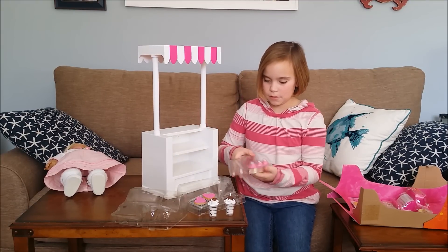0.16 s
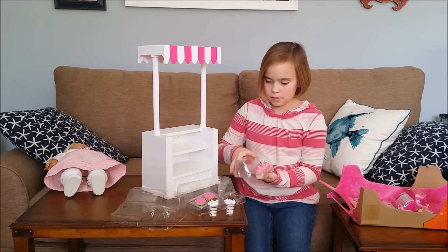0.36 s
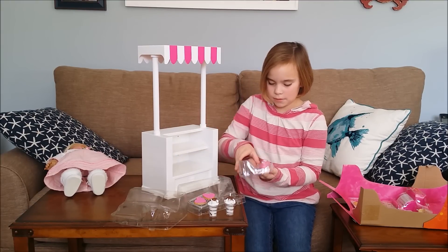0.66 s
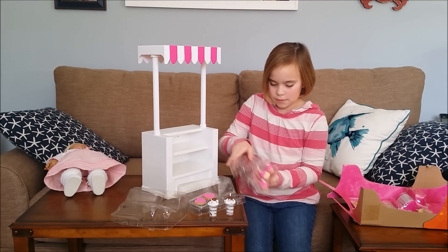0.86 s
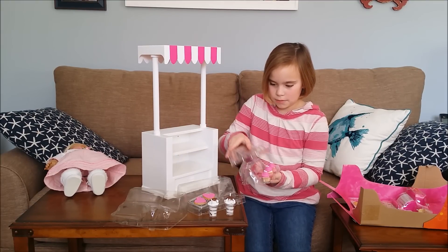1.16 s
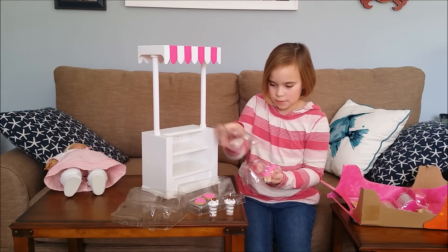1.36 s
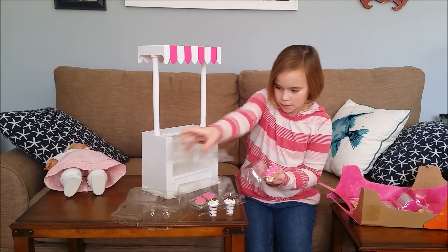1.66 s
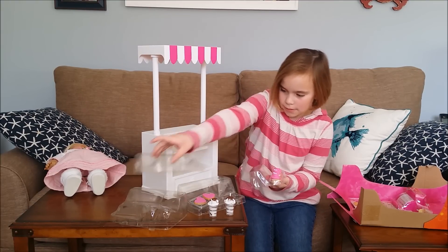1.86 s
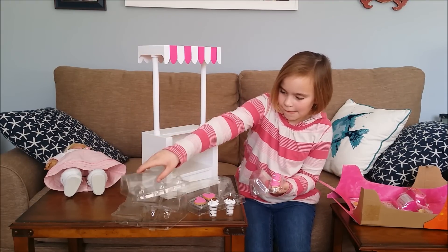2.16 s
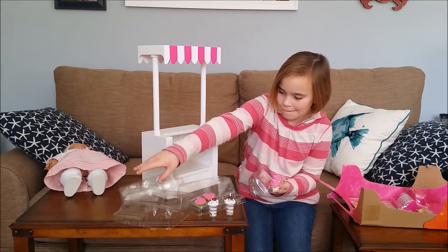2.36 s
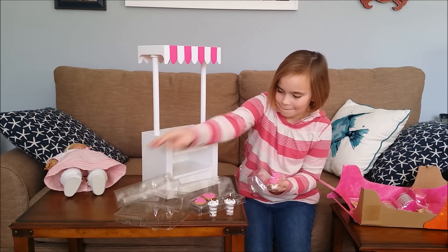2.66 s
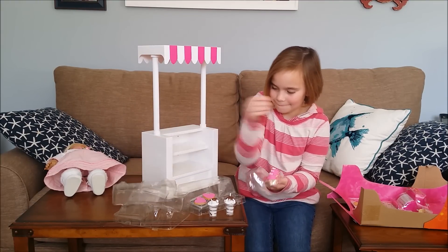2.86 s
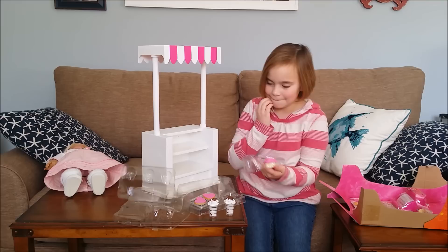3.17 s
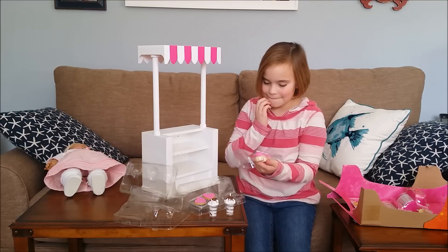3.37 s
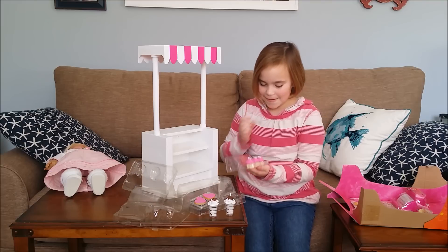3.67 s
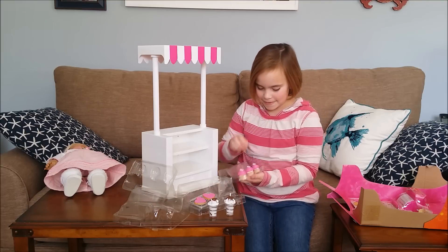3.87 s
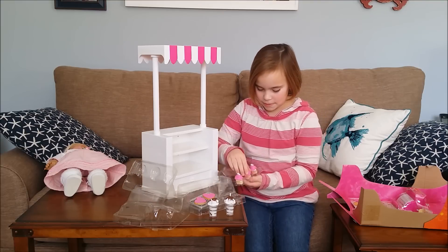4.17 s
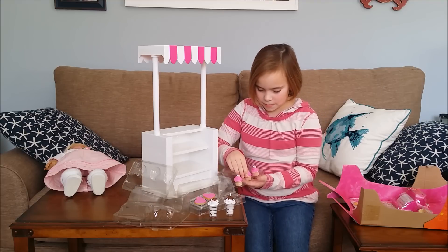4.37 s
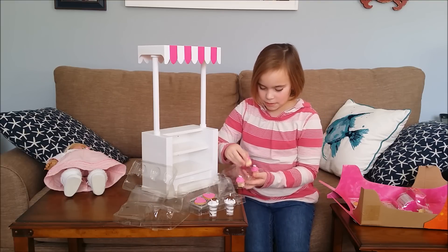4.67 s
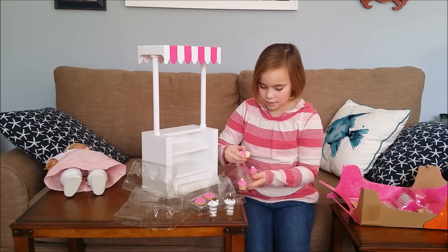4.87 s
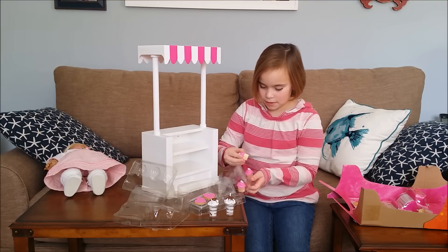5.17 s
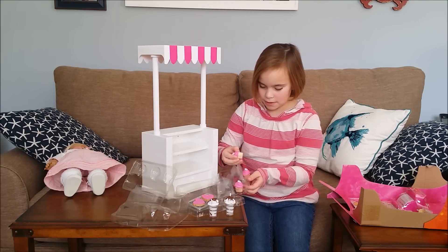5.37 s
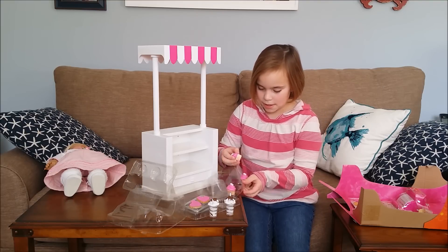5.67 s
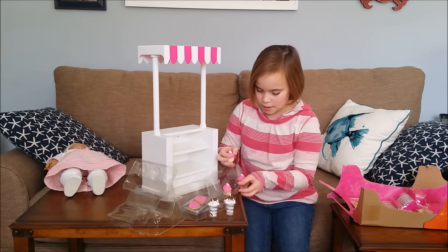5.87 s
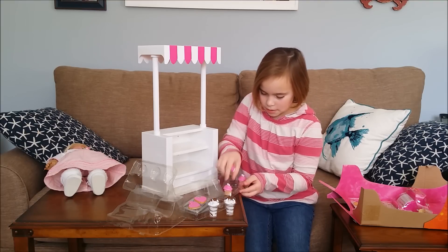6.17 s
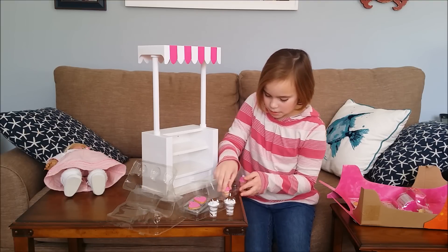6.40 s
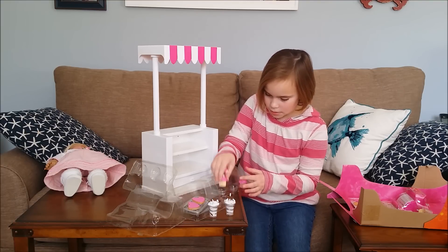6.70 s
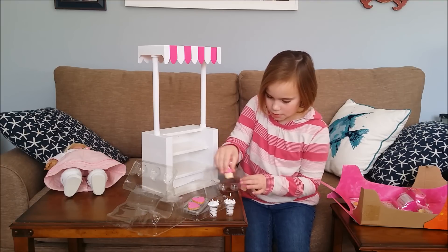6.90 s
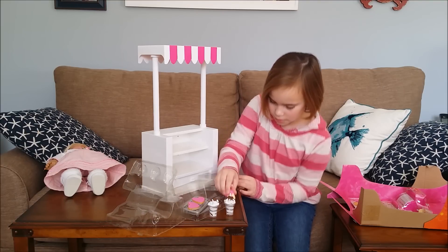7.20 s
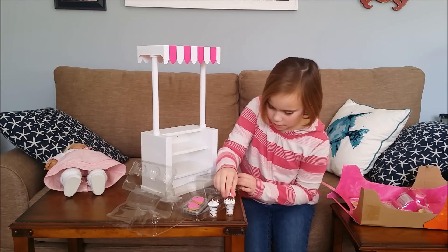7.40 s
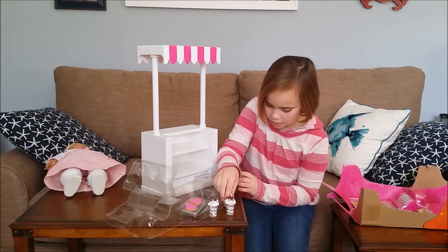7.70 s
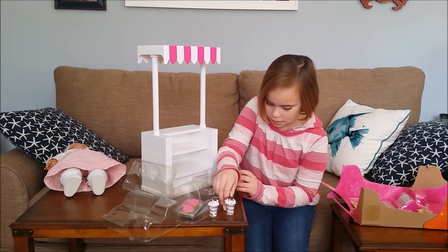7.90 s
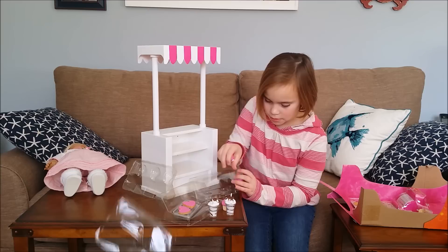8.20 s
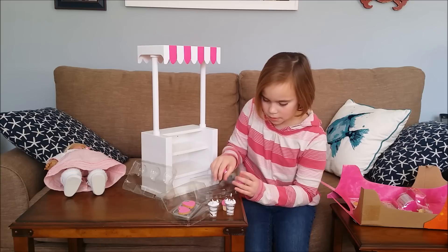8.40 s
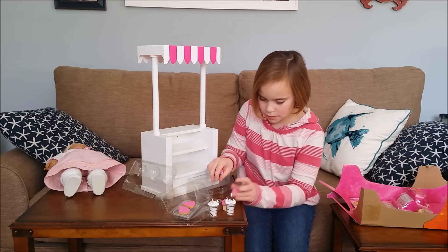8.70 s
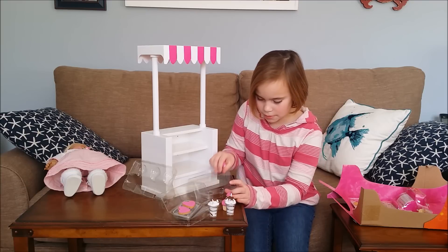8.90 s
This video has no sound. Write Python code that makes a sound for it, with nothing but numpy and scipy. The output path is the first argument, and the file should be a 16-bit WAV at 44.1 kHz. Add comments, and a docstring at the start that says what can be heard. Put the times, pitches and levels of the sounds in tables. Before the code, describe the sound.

A stiff clear plastic tray is handled close to the microphone in a furnished room. It starts with light rustling and small crackles, then sharper snaps and dull pops around 1 second as it is pried open. From about 2.2 to 3.6 seconds the plastic drops and shifts on a wooden table with hollow taps, soft thuds and crinkles. Sparse, quieter clicks follow, with brief scraping near 5.5 to 6 seconds and a light knock at 6.5. Between 7.1 and 7.5 seconds comes the brightest cluster of loud snaps, with a rubbing scrape. Small knocks continue around 8 seconds. At 8.7 a hollow plastic toy topples onto the wood with a short clatter and crackle, the loudest knock, followed by a last small tap near 9. A faint mains hum, low house rumble and hiss run throughout.

```python
"""Film rustles and creases snap as a stiff clear plastic tray is pried open on a wooden table.
Its walls buckle with dull pops; it is dropped and pushed about, toys knock, and one topples near the end.
Creases release elastic energy in bright bursts, impacts excite the modes of tray, toy and table top,
and sliding friction scrapes. Two close microphone ports hear this directly and through a furnished room,
over mains hum, a low house rumble and hiss."""
import sys
import numpy as np
from scipy import signal
from scipy.fft import rfft, irfft, next_fast_len
from scipy.io import wavfile
from scipy.ndimage import uniform_filter1d

SR = 44100
rng = np.random.default_rng(int(sys.argv[2]) if len(sys.argv) > 2 else 0)


def wav_out(sig):
    """Save sig, one row per channel (or a flat mono array), as 16-bit PCM at SR to the path in sys.argv[1]."""
    wavfile.write(sys.argv[1], SR, np.round(np.clip(np.atleast_2d(sig).T, -1, 1) * 32767).astype(np.int16))


N = 399100

# spectra of the film and of its finest creases: f/Hz, relative level/dB
FILM_SPECTRUM = [(1290, -10.5), (2200, -6), (2790, -7), (3040, -6.5), (3910, -5), (5090, -3), (6660, -1.5),
                 (7570, -7), (9500, -9.5), (12400, -31), (20900, -120)]
FINE_CREASE_SPECTRUM = [(7000, -19.5), (9000, 10), (10000, -6.5), (14000, -8)]
# modes of the table top: f/Hz, bandwidth/Hz, gain/dB
TABLE_MODES = [(117.1, 37, -15.5), (183.1, 37, -3), (213.5, 42, -1), (253, 36, -3), (321, 43, -5.5)]
# handling of the tray: t/s, rustle level/dB, scraping re rustle/dB
HANDLING = [(0.0, -47, 0), (0.2, -58, 3), (0.58, -63, -0.5), (0.9, -66.5, 4.5), (1.06, -56.5, -2),
            (1.39, -67.5, -4), (2.24, -70.5, -5), (2.42, -57, 3), (4.06, -72.5, -4), (5.22, -68, 1),
            (5.46, -57, 6.5), (5.53, -54.5, 6.5), (5.61, -55, 6.5), (5.72, -51, 4), (5.86, -58, 5.5),
            (5.95, -54.5, 4.5), (6.3, -67.5, -1), (6.7, -56, 4.5), (6.86, -67, 5.5), (7.16, -71, 5),
            (7.31, -48.5, 5.5), (7.71, -62.5, 9), (8.22, -52, 1.5), (8.34, -68.5, 4), (8.62, -64.5, 1),
            (8.75, -51.5, 16), (9.05, -63, -3.5)]


def amp(db):
    """Amplitude ratio of a level in dB."""
    return 10 ** (np.asarray(db) / 20)


def unit(x):
    """Normalisation to rms 1."""
    return x / np.sqrt(np.mean(x ** 2) + 1e-20)


def along(points, hz):
    """Interpolation of (f/Hz, value) points on a logarithmic frequency axis."""
    f, values = np.transpose(points)
    return np.interp(np.log(hz + 1), np.log(f + 1), values)


def curves(rows):
    """Linear interpolation in time: one value per sample for each column after t/s."""
    times, *columns = np.transpose(rows)
    return [np.interp(np.arange(N) / SR, times, column) for column in columns]


def filtered(x, response):
    """Linear filtering: the spectrum of x times a complex frequency response."""
    n = x.shape[-1]
    size = next_fast_len(n + SR // 4)
    return irfft(rfft(x, size) * response(np.fft.rfftfreq(size, 1 / SR)), size)[..., :n]


def coloured(x, spectrum):
    """Spectral shaping by a filter whose impulse response has energy 1."""
    def response(hz):
        gain = amp(along(spectrum, hz))
        return gain / np.sqrt(np.mean(gain ** 2))
    return filtered(x, response)


def resonances(modes):
    """Modal superposition: damped resonators (f/Hz, bandwidth/Hz, gain/dB) of alternating sign."""
    return lambda f: sum((-1) ** k * amp(db) * 1j * f * width / (f0 * f0 - f * f + 1j * f * width)
                         for k, (f0, width, db) in enumerate(modes))


def add(track, start_s, sound):
    """Superposition of a sound on a track."""
    part = track[..., round(start_s * SR):][..., :sound.shape[-1]]
    part += sound[..., :part.shape[-1]]


def grains(per_s, spread_db, life_s, bed):
    """Shot noise: random decaying pulses over a steady bed modulate white noise, rms 1."""
    hits = (rng.random(N) < per_s / SR) * amp(spread_db * rng.standard_normal(N))
    pulses = signal.lfilter([1], [1, -np.exp(-1 / (SR * life_s))], hits)
    return unit(rng.standard_normal(N) * (unit(pulses) + bed))


def contact_bursts(envelope, count):
    """Many small contacts sum to noise: bursts under an envelope, their spectra partly whitened."""
    spectra = rfft(envelope * rng.standard_normal((count, len(envelope))))
    bursts = irfft(spectra / np.abs(spectra) ** 0.14, len(envelope))
    return bursts * np.linalg.norm(envelope) / np.linalg.norm(bursts, axis=1, keepdims=True)


def noise_floor():
    """Partial coherence: the two ports share part of a steady rumble and hiss."""
    # rumble and hiss: f/Hz, relative level/dB
    spectrum = [(18, -40), (30, -42), (45, -4), (91, -12), (123, 3.5), (152, -24), (191, -0.5), (320, -16),
                (393, -6), (470, -20), (728, -17.5), (1040, -21.5), (14500, -30.5), (14800, -66)]
    # likeness of the ports: f/Hz, correlation
    coherence = [(60, 0.72), (180, 0.95), (550, 0.072), (1650, -0.5), (4970, -0.07), (15000, 0.15)]

    def mid_and_side(hz):
        angle = np.arccos(np.clip(along(coherence, hz), -1, 1)) / 2
        return amp(along(spectrum, hz)) * [np.cos(angle), np.sin(angle)]
    mid, side = filtered(rng.standard_normal((2, N)), mid_and_side)
    return amp(-55) * unit(np.array([mid + side, mid - side]))


def mains_hum():
    """Phase modulation: a common random walk makes the hum's spectral lines unsteady."""
    # hum lines: f/Hz, rms level/dB
    lines = [(59.2, -64.5), (118.4, -69.5), (183.0, -77)]
    t = np.arange(N) / SR
    drift = np.cumsum(rng.standard_normal(N)) * 0.016  # radians at 60 Hz
    return sum(np.sqrt(2) * amp(db)
               * np.sin(2 * np.pi * hz * t + drift * hz / 60 + rng.uniform(0, 2 * np.pi))
               for hz, db in lines)


def house_rumble():
    """Narrow-band noise: two low resonances give a deep rumble that comes and goes."""
    # course of the rumble: t/s, level/dB
    levels = [(0, -49), (.3, -53.5), (1.76, -66), (3.48, -53), (3.73, -64), (5, -65), (5.9, -53.5),
              (6.32, -68), (7.6, -54.5), (9.05, -65)]
    deep = resonances([(66.4, 13.0, -0.43), (127.5, 22.0, -1.6)])
    rumble = filtered(rng.standard_normal(N), lambda hz: deep(hz) ** 2)
    return amp(curves(levels)[0]) * unit(rumble)


def reverberation(source):
    """A diffuse field decays exponentially; the source moves, so each 0.2 s gets a new tail."""
    # room decay: f/Hz, reverberation time/s, level/dB
    bands = [(150, 0.37, 2), (495, 0.62, 1.5), (1400, 0.27, -0.5), (3870, 0.35, 2), (8700, 0.32, -5),
             (14000, 0.13, 13.5)]
    # long waves reach both ports alike: f/Hz, correlation
    coherence = [(300, 0.96), (1000, 0.1), (3000, 0.072)]
    out, step = np.zeros((2, N)), SR // 5
    starts = range(0, N, step)
    hz, t, noise = signal.stft(rng.standard_normal((2, len(starts), SR * 2 // 5)), SR, nperseg=256)
    alike = np.clip(along(coherence, hz), 0, 1)[:, None]
    noise[1] = alike * noise[0] + np.sqrt(1 - alike ** 2) * noise[1]
    band_hz, t60, level_db = np.transpose(bands)
    decay = amp(-60 * t / along(np.transpose([band_hz, t60]), hz)[:, None])
    band_gain = amp(along(np.transpose([band_hz, level_db]), hz))[:, None]
    decay *= band_gain / np.linalg.norm(decay, axis=1, keepdims=True)
    tails = signal.istft(noise * decay, SR, nperseg=256)[1] / np.sqrt(128)
    for k, start in enumerate(starts):
        wet = signal.fftconvolve(source[None, start:start + step], tails[:, k], axes=1)
        add(out, start / SR + .006, wet)
    return out


def with_wall_echoes(pair):
    """Early reflections follow the direct sound, with slightly different delays at each port."""
    # echoes: delay/s, level/dB
    echoes = [(.0025, -9.5), (.0078, -8.5), (0.013, -14), (.018, -14), (0.037, -12.5)]
    response = np.zeros((2, SR // 20))
    response[:, 0] = 1
    for delay_s, db in echoes:
        taps = np.round((delay_s + rng.normal(0, .0001, 2)) * SR).astype(int)
        response[[0, 1], taps] += amp(db)
    return signal.fftconvolve(pair, response, axes=1)[:, :N]


def at_ports(source):
    """Directivity: sound from the table's direction differs in level and phase between the ports."""
    # left over right: f/Hz, level difference/dB
    level_difference = [(60, -14), (130, 6.5), (290, 0), (640, 3), (1410, 2.5), (3100, 3), (6820, 13),
                        (15000, -31)]
    # left ahead of right: f/Hz, phase/rad
    phase_lead = [(0, 0.5), (6030, 1.55), (7060, -2.5), (9650, 5), (11500, 8), (12400, 7), (14300, -3)]
    pan_db = -2.5  # the hands work a little to the right
    half = np.array([[.5], [-.5]])

    def response(hz):
        phase = half * np.interp(hz, *np.transpose(phase_lead))
        return amp(half * along(level_difference, hz)) * np.exp(1j * phase)
    return filtered(with_wall_echoes(source * amp(half * pan_db)), response)


def film_rustle():
    """Crackling noise: the handled film emits dense tiny pulses in random swells."""
    rustle_db, _ = curves(HANDLING)
    swells = unit(uniform_filter1d(uniform_filter1d(rng.standard_normal(N), SR // 40), SR // 40))
    crackle = grains(per_s=500, spread_db=4, life_s=.0012, bed=.5) * amp(2.5 * swells)
    fine = amp(-10.5) * coloured(crackle, FINE_CREASE_SPECTRUM)
    return amp(rustle_db) * (coloured(crackle, FILM_SPECTRUM) + fine)


def scraping():
    """Sliding friction radiates noise, excites a hollow of the tray and shakes the table."""
    # tray sliding on wood: f/Hz, relative level/dB
    spectrum = [(240, -53), (400, -10), (454, -9.5), (589, -10.5), (847, -0.5), (1200, -3), (1520, -2),
                (1650, -5), (3000, -12.5), (3900, -17), (6600, -120)]
    # the rubbed hollow sings out: t/s, duration/s, level/dB
    rubs = [(0.12, 0.079, -56), (0.249, 0.024, -43), (5.698, 0.03, -44), (5.862, 0.035, -47),
            (7.196, 0.03, -30.5), (7.31, 0.061, -37.5), (8.564, 0.062, -40), (8.936, 0.03, -38.5)]
    hollow_db, ramp_s = -15, 0.019
    t = np.arange(N) / SR
    rustle_db, excess_db = curves(HANDLING)
    scrape_db = rustle_db + excess_db
    rumble_db = -62.5 + 0.43 * (scrape_db + 66)  # grows more slowly than the scraping
    rub_gain = sum(amp(db) * np.clip(np.minimum(t - start, start + length - t) / ramp_s, 0, 1)
                   for start, length, db in rubs)
    friction = grains(per_s=70, spread_db=2, life_s=0.004, bed=1.7)
    shaking = grains(per_s=30, spread_db=2, life_s=0.01, bed=2.0)
    scrape = unit(coloured(friction, spectrum))
    hollow = unit(filtered(friction, resonances([(850, 60, 0)])))
    rumble = unit(filtered(shaking, resonances([(189, 87, 2.5), (433, 265, -4)])))
    return (amp(scrape_db) * scrape + (amp(scrape_db + hollow_db) + rub_gain) * hollow
            + amp(rumble_db) * rumble)


def table_thuds():
    """Impact excitation: a half-sine force pulse rings the modes of the table top."""
    # something lands: t/s, peak level/dB
    landings = [(2.424, -38), (2.545, -34), (3.24, -32), (3.302, -33), (6.485, -29.5), (6.512, -37),
                (7.312, -35.5), (8.002, -42.5), (8.671, -20), (8.7, -24.5), (8.96, -33)]
    contact_s = 0.0018
    out, t = np.zeros(N), np.arange(SR // 5) / SR
    force = np.sin(np.pi * np.minimum(t / contact_s, 1))
    ring = filtered(force, resonances(TABLE_MODES))
    for start, db in landings:
        add(out, start, amp(db) * ring / np.abs(ring).max())
    return out


def toy_clatter():
    """Modal ringing: a hollow toy topples, and its brief rattle drives its own resonances."""
    # modes of the toy: f/Hz, bandwidth/Hz, gain/dB
    toy_modes = [(664, 48, -3.5), (843, 40, -6), (1060, 30, 1), (1506, 36, -3.5), (1702, 89, 0.5),
                 (1927, 51, 4), (2030, 44, 2.5), (2600, 880, -12)]
    start_s, drive_db, rise_s, decay_s = 8.669, 4.1, 0.0035, 0.026
    force, t = np.zeros(N), np.arange(SR // 6) / SR
    envelope = np.exp(-t / decay_s) * (1 - np.exp(-t / rise_s))
    add(force, start_s, amp(drive_db) * contact_bursts(envelope, count=1)[0])
    return filtered(force, resonances(toy_modes))


def pops_and_knocks():
    """Buckling and impact: each burst rings its own pitch, the tray and the table; the film swishes."""
    # walls buckle, toys knock: t/s, level/dB, f/Hz, gain of that pitch/dB, swish gain/dB, decay time/s
    events = [(0.968, -27.5, 1540, 9, -12.5, 0.022), (1.064, -31, 340, 14, -8, 0.0081),
              (1.165, -37, 1800, 15, -3, 0.021), (1.194, -26.5, 960, -5, -11.5, 0.01),
              (1.2, -28, 331, 18.5, -23, 0.006), (2.211, -35.5, 1006, 2, -19, 0.022),
              (2.255, -28.5, 880, -7, -16.5, 0.04), (2.417, -27.5, 760, 9.5, -23, 0.062),
              (2.435, -33, 510, 21, -28, 0.028), (2.544, -24.5, 706, 10.5, -29, 0.012),
              (2.633, -23, 702, 11.5, -26, 0.016), (2.818, -35.5, 675, 12, -32, 0.037),
              (3.112, -31, 751, 3, -11, 0.09), (3.24, -20, 1130, 7, -21.5, 0.012),
              (3.29, -29, 400, 6.5, -21, 0.082), (3.537, -29, 1240, 8.5, -20, 0.022),
              (3.545, -38, 2860, 17, -17, 0.02), (3.625, -35.5, 2780, 7.5, -15, 0.027),
              (4.025, -45.5, 1500, 16, -9, 0.016), (4.043, -39.5, 1580, 13.5, -8, 0.014),
              (4.088, -42, 2500, 16.5, 9.5, 0.019), (4.38, -42, 1033, -3, -7, 0.07),
              (4.391, -28, 915, 2, -28, 0.0077), (4.869, -45.5, 1370, 11.5, -5.5, 0.017),
              (5.091, -43.5, 940, 8, -13, 0.013), (5.226, -42.5, 1130, 3, -9, 0.14),
              (5.49, -35, 780, 10.5, -26, 0.038), (5.787, -41, 1920, 13, -17, 0.025),
              (5.915, -37, 890, 14, -9, 0.036), (5.949, -40.5, 970, 18, -1, 0.01),
              (6.462, -37.5, 892, 16, -7.5, 0.06), (6.482, -20.5, 930, 9, -31, 0.0085),
              (6.756, -39.5, 825, 12.5, -28, 0.03), (7.146, -27.5, 1570, 12, -30, 0.0079),
              (7.194, -35, 869, 14, 1, 0.014), (7.235, -40, 1620, 13, -14, 0.029),
              (7.313, -21, 867, 9, -19, 0.016), (7.644, -37, 1550, 7.5, -15.5, 0.19),
              (7.775, -34.5, 820, 13, -19, 0.043), (7.999, -34, 745, 7.5, -11.5, 0.043),
              (8.032, -41.5, 517, 9, 2, 0.039), (8.124, -31.5, 926, -6, -28, 0.032),
              (8.295, -27, 904, 2, -17, 0.012), (8.554, -37, 1490, 15.5, -10, 0.045),
              (8.573, -30, 856, 17, -16, 0.029), (8.667, -9, 319, 5, -11.5, 0.032)]
    # modes of the hollow tray and toys: f/Hz, bandwidth/Hz, gain/dB
    tray_modes = [(500, 150, 0), (684, 60, 6), (788, 270, 0.5), (1063, 344, 2.5), (1457, 140, 2),
                  (1780, 250, -2.5), (1940, 180, -3.5), (2260, 150, -1)]
    tray_db, table_db, rise_s = 4, 8.5, 0.0029
    blunt_hz = 3000  # blunt contacts carry little treble
    pitched, tray, table, swish = np.zeros((4, N))
    t = np.arange(SR // 6) / SR
    for start, db, hz, pitch_db, swish_db, decay_s in events:
        envelope = np.exp(-(t / decay_s) ** 1.07) * (1 - np.exp(-t / rise_s))
        bursts = contact_bursts(envelope, count=4)
        band = signal.butter(2, [hz * 0.864, hz / 0.898], "bandpass", fs=SR)
        add(pitched, start, amp(db + pitch_db) * signal.lfilter(*band, bursts[0]))
        add(tray, start, amp(db + tray_db) * bursts[1])
        add(table, start, amp(db + table_db) * bursts[2])
        add(swish, start, amp(db + swish_db) * bursts[3])
    knocks = pitched + filtered(tray, resonances(tray_modes)) + filtered(table, resonances(TABLE_MODES))
    softened = filtered(knocks, lambda hz: 1 / (1 + 1j * hz / blunt_hz) ** 2)
    return softened + coloured(swish, FILM_SPECTRUM)


def crease_snaps():
    """Elastic release: each crease creeps, lets go in a burst that rings at its own pitch, and settles."""
    # snaps: t/s, level/dB, weight of the dull mids/dB, weight of the finest creases/dB, ringing f/Hz
    snaps = [(0.097, -34.5, -19, -4, 6900), (0.147, -41, -3, -10, 6700), (0.175, -28.5, -35, -8, 5740),
             (0.2316, -39, -7, -14, 5500), (0.2531, -35.5, -7, -3, 6700), (0.2867, -37.5, -12, 2, 6420),
             (0.318, -30, -14, -6, 6200), (0.427, -41, -1.5, 1, 3520), (0.525, -43.5, 0, 1, 3730),
             (0.869, -33, -17, -12, 4060), (0.8753, -27.5, -18, -8, 6740), (0.883, -33.5, -10, -12, 4460),
             (0.916, -30.5, -14, -16, 4050), (0.9247, -34, -4, -18, 6900),
             (0.9359, -16.5, -30, -11.5, 6800), (1.055, -36, -2, -21, 6300), (1.1004, -26, -11, 5.5, 4760),
             (1.115, -21.5, -22, -13, 6770), (1.1683, -29.5, -4, -2, 4900), (1.3493, -30.5, -45, -12, 6500),
             (2.2169, -44, -15, -4, 9000), (2.2578, -46, 9, 16, 7200), (2.4204, -38, -2.5, 1, 6960),
             (2.544, -35.5, -9, -18, 6510), (2.633, -40, -8, -9, 9300), (2.824, -36.5, -34, -18, 6230),
             (2.9188, -31, -42, -8, 5900), (3.1124, -36, -6, 2, 5970), (3.131, -31.5, -17, 1, 9200),
             (3.163, -33, -10, 1, 8600), (3.241, -36, -10, 1.5, 6600), (3.5395, -27.5, -6, -10, 2980),
             (3.623, -38, -2, -6, 2970), (4.082, -35.5, -27, 7, 8500), (4.088, -40, -19, 4, 4780),
             (4.099, -30.5, -17, 3.5, 7050), (4.3922, -47, 3, 10, 6160), (4.861, -42.5, -15, -6, 6260),
             (5.224, -36.5, -10, -2, 6300), (5.5052, -38, -1, -18, 4120), (5.662, -33.5, -20, -12, 6440),
             (5.9653, -33, -6, 1, 4350), (6.0308, -45, -23, -15, 6900), (6.4675, -31.5, -2, -5, 6460),
             (6.6748, -41, -26, -6, 4120), (6.762, -33, -16, -8, 8160), (7.102, -28, -9.5, -2, 7000),
             (7.1668, -29, -27, 0, 7100), (7.188, -31, -27, -8, 7150), (7.2, -20, -12, 2, 6300),
             (7.204, -13.5, -19, -2.5, 7350), (7.2426, -21, -10, -5, 5900), (7.282, -24, -17, 2, 6960),
             (7.287, -17, -21, 1.5, 4060), (7.3125, -17, -15.5, -3, 9160), (7.337, -26.5, -17, -5, 8700),
             (7.405, -34, -13, -6, 6600), (7.441, -30.5, -11, -3, 7050), (7.4673, -14, -18.5, -0.5, 6980),
             (7.589, -35, -23, -18, 7030), (8.159, -42, -29, 5, 7550), (8.2963, -29, -6, -2, 6400),
             (8.571, -31, -19, -13, 6990), (8.5885, -26.5, -11, -14, 9060), (8.675, -26, -3, -6, 6640),
             (8.6824, -16, -10, -13, 6340), (8.689, -15.5, -12, -7, 7100), (8.907, -27, -29, -14, 5600)]
    creep_db, creep_s, growth_s = -28, .012, 0.0066
    settle_db, settle_s = -21, 0.013
    release_t60_s, ring_t60_s = 0.008, 0.0062
    sharp, fine, dull, ring = np.zeros((4, N))
    t = np.arange(SR // 16) / SR
    after = np.maximum(t - creep_s, 0)
    release = amp(-60 * after / release_t60_s) * (1 - np.exp(-after / 0.00045))
    creeping = amp(creep_db) * np.exp((t - creep_s) / growth_s)
    settling = amp(settle_db) * np.exp(-after / settle_s)
    slips = np.where(t < creep_s, creeping, settling)
    ring_envelope = amp(-60 * t / ring_t60_s) * (1 - np.exp(-t / 0.00036))
    for start, db, dull_db, fine_db, hz in snaps:
        ragged = np.repeat(rng.exponential(size=len(t) // 40 + 1), 40)[:len(t)]  # slips of about 1 ms
        burst = contact_bursts(release + ragged * slips, count=1)[0]
        add(sharp, start - creep_s, amp(db + 0.5) * burst)
        add(fine, start - creep_s, amp(db + fine_db - 2.5) * burst)
        add(dull, start - creep_s, amp(db + dull_db + 15) * burst)
        add(ring, start, amp(db + 3.5) * ring_envelope * np.sin(2 * np.pi * hz * t))
    mids = resonances([(2050, 3370, 0)])
    return (coloured(sharp, FILM_SPECTRUM) + coloured(fine, FINE_CREASE_SPECTRUM)
            + filtered(dull, lambda hz: mids(hz) ** 2) + ring)


def scene():
    """Superposition: direct sound, wall echoes and the diffuse field add to the background."""
    source = crease_snaps() + pops_and_knocks() + table_thuds() + toy_clatter()
    source += film_rustle() + scraping()
    return at_ports(source) + reverberation(source) + noise_floor() + mains_hum() + house_rumble()


def record(dry):
    """Band limiting: deep bass is weak, and the treble falls steeply above 14.5 kHz."""
    # overall frequency response: f/Hz, gain/dB
    overall_tone = [(32, -17), (50, -1), (6100, -3.5), (6700, -1.5), (7300, -0.5), (13500, -2.5),
                    (14500, -8.5), (14900, -29), (16000, -26)]
    limit_hz = 16000
    return filtered(dry, lambda hz: amp(along(overall_tone, hz)) * (hz < limit_hz))


dry = scene()
out = record(dry)
wav_out(out)
```